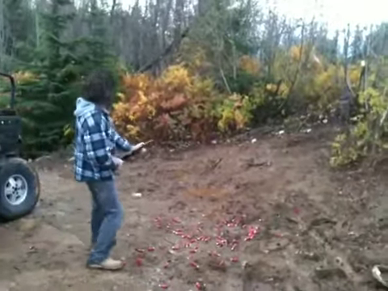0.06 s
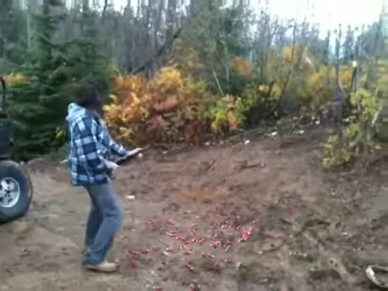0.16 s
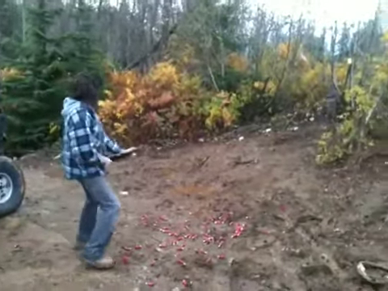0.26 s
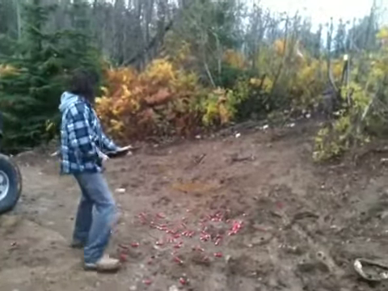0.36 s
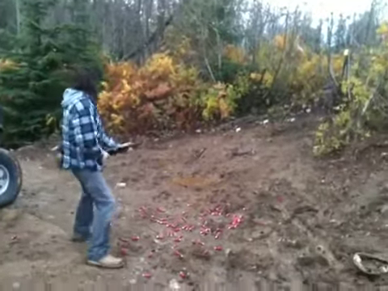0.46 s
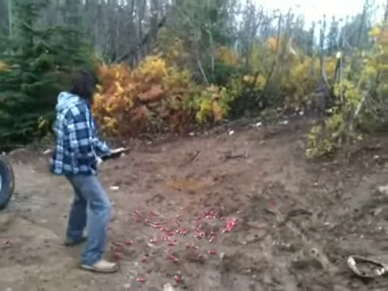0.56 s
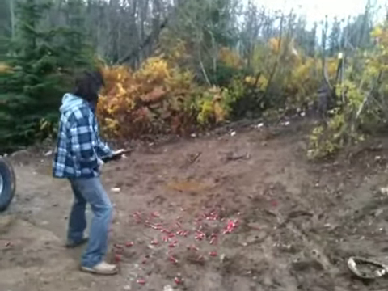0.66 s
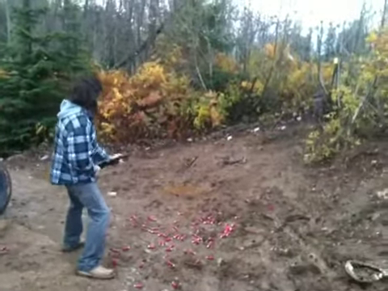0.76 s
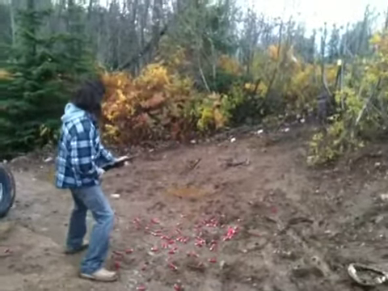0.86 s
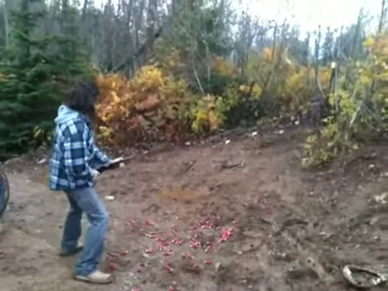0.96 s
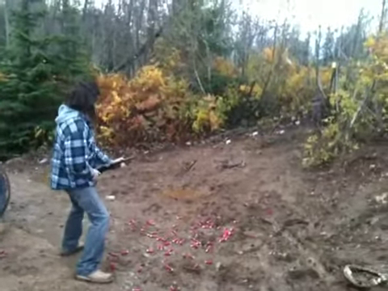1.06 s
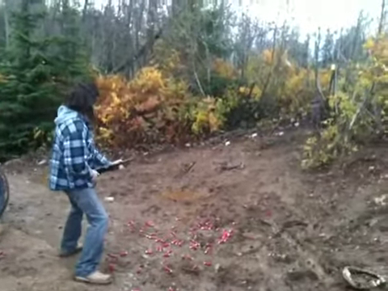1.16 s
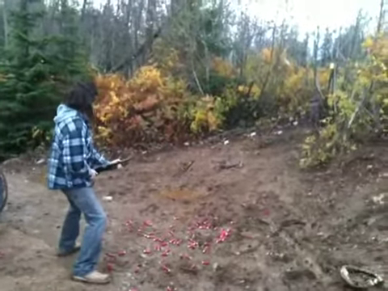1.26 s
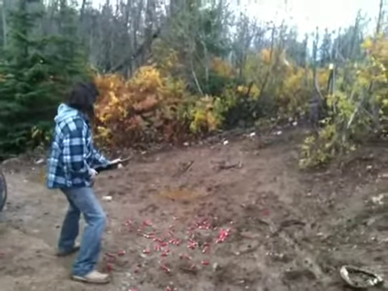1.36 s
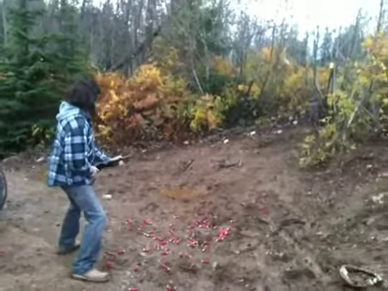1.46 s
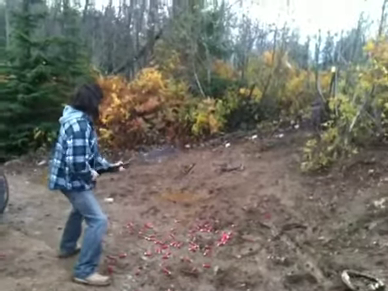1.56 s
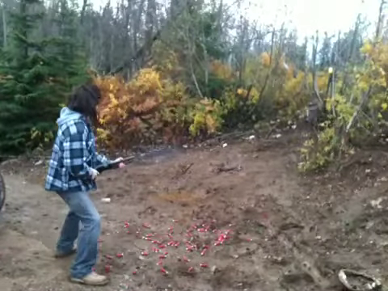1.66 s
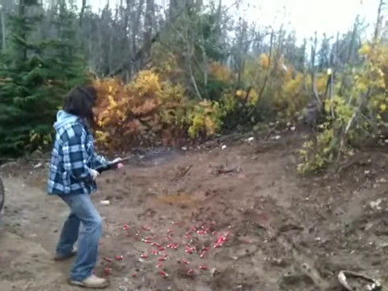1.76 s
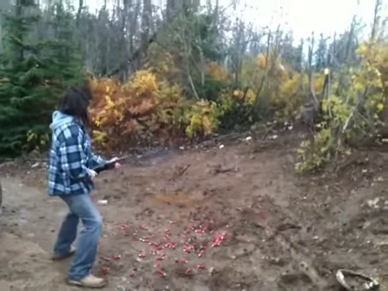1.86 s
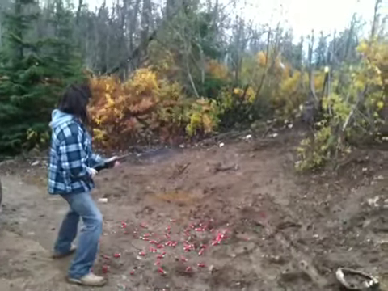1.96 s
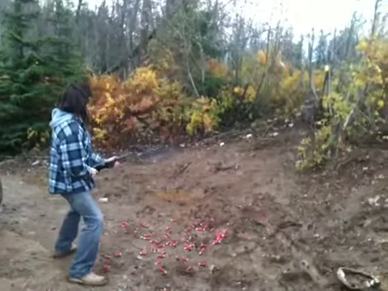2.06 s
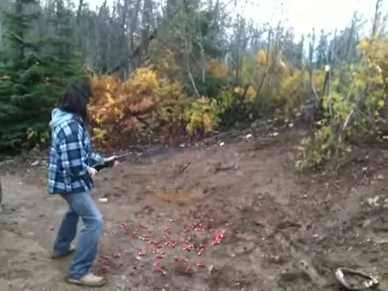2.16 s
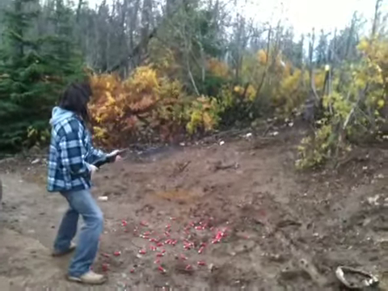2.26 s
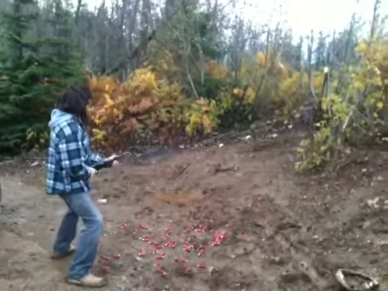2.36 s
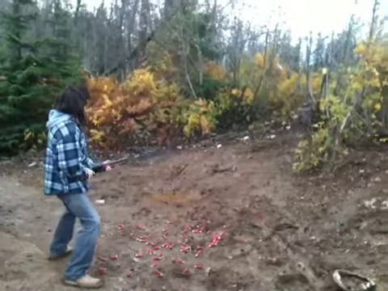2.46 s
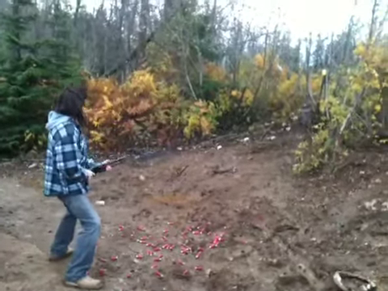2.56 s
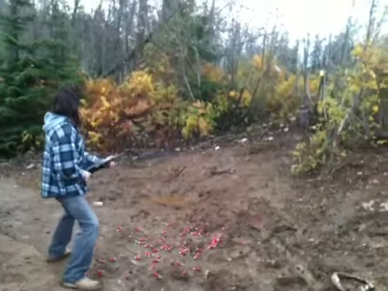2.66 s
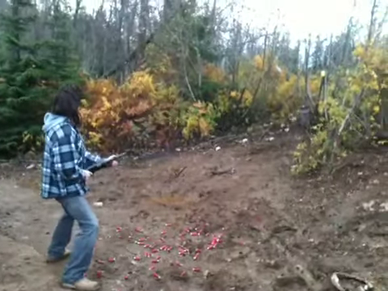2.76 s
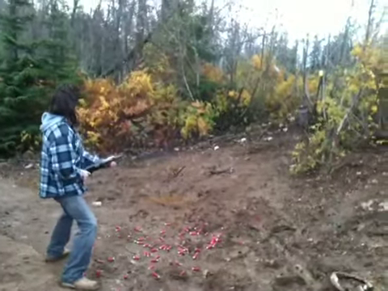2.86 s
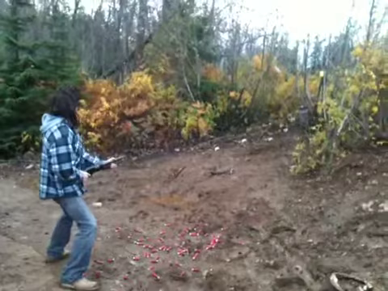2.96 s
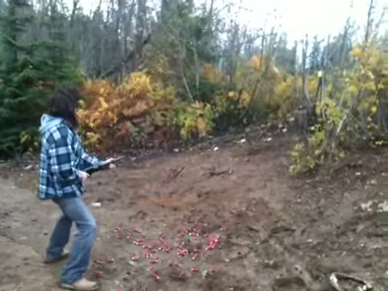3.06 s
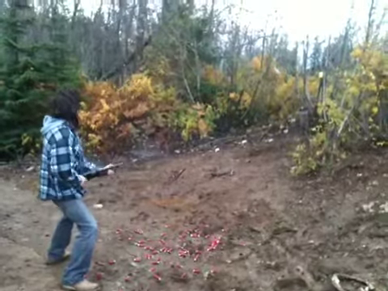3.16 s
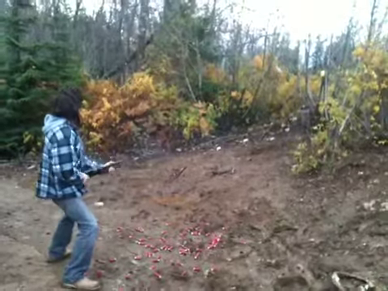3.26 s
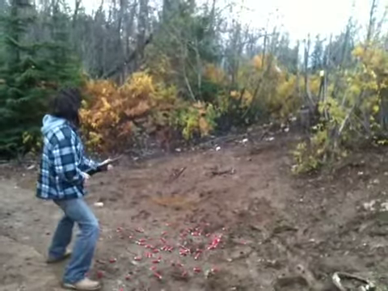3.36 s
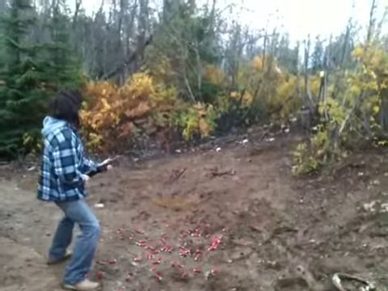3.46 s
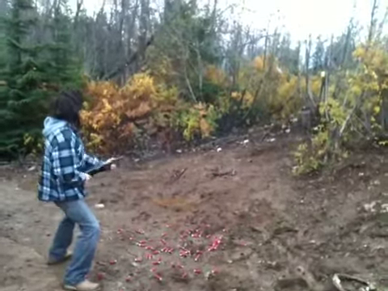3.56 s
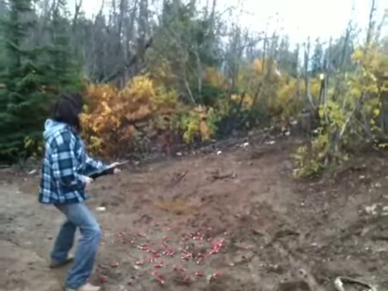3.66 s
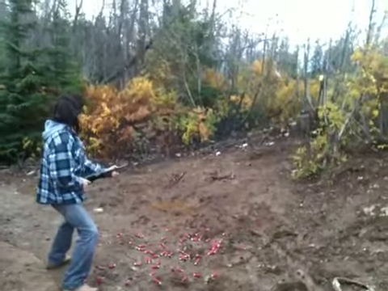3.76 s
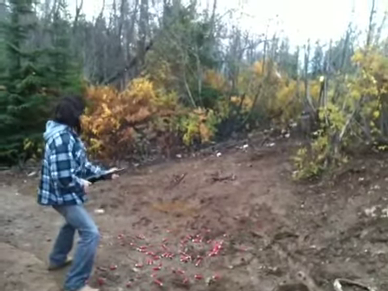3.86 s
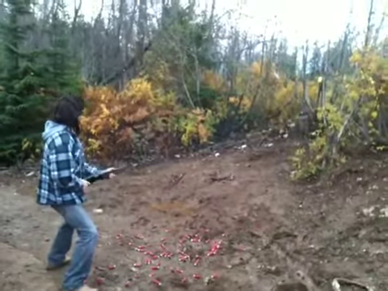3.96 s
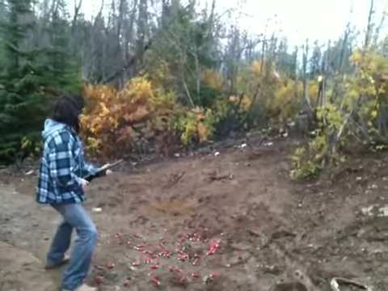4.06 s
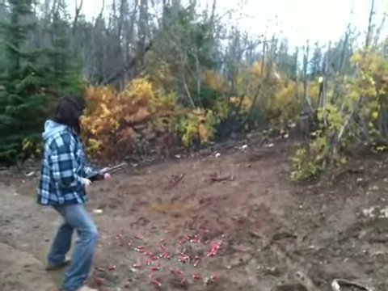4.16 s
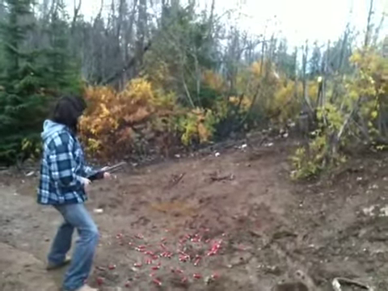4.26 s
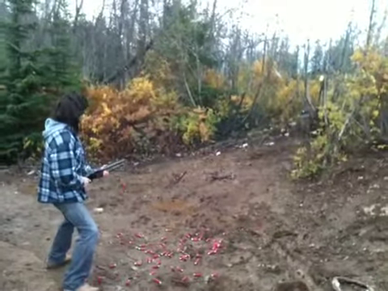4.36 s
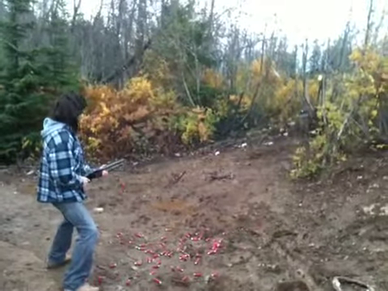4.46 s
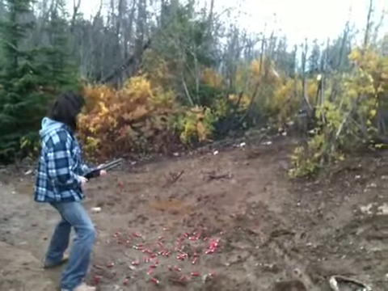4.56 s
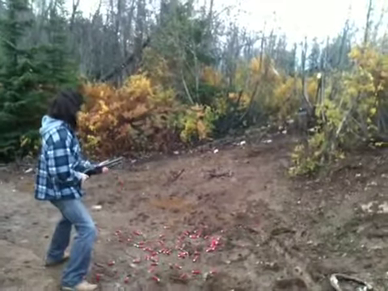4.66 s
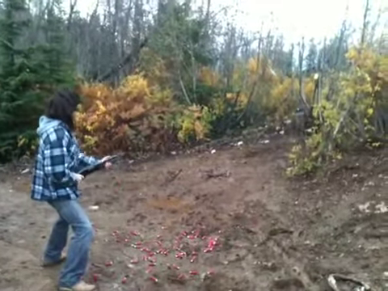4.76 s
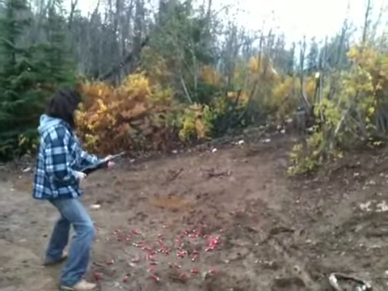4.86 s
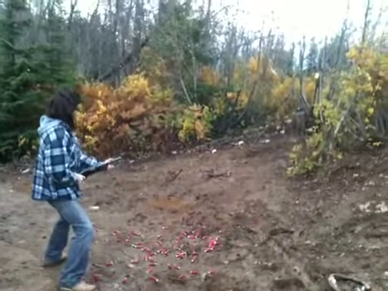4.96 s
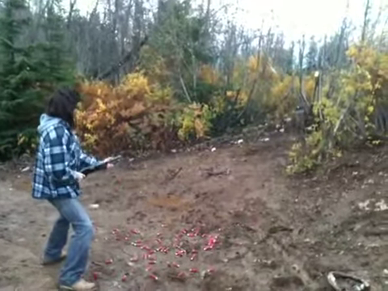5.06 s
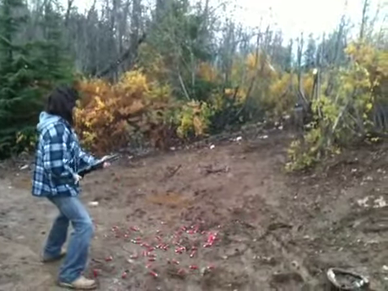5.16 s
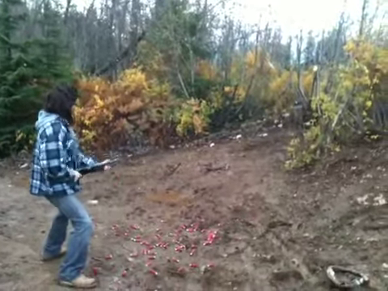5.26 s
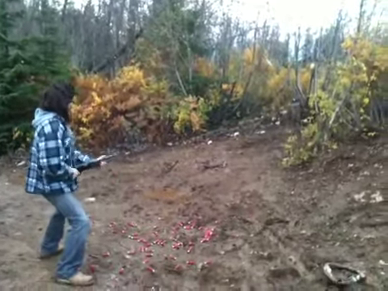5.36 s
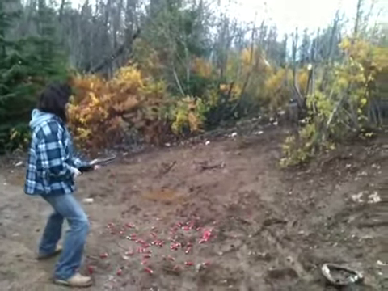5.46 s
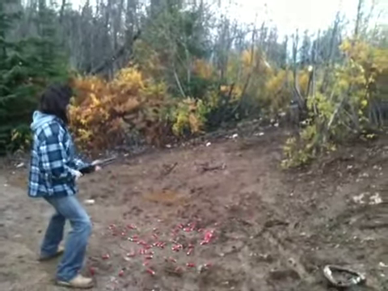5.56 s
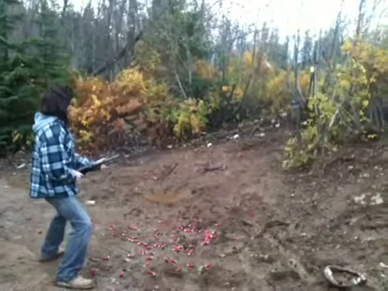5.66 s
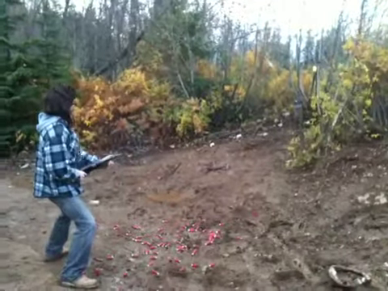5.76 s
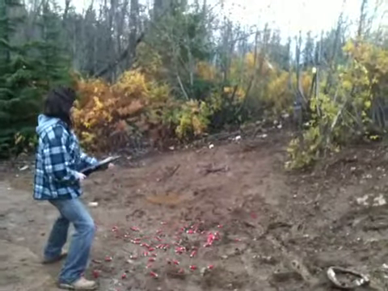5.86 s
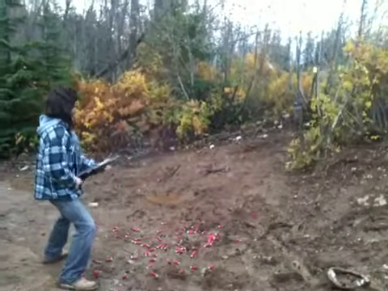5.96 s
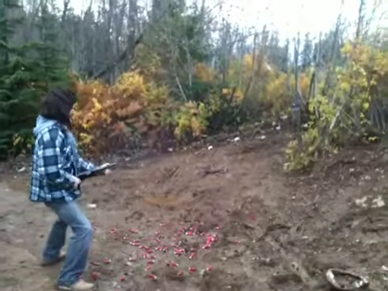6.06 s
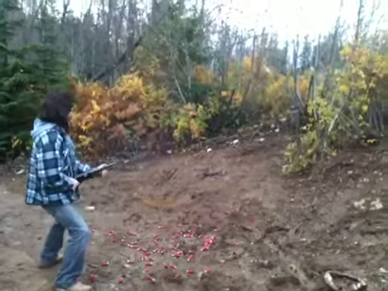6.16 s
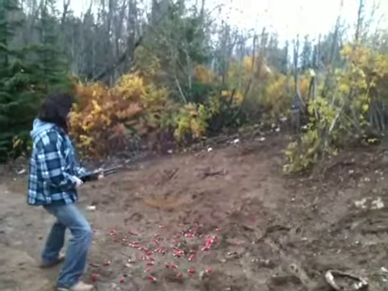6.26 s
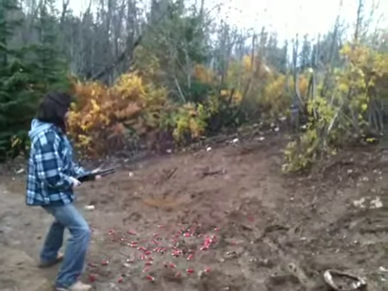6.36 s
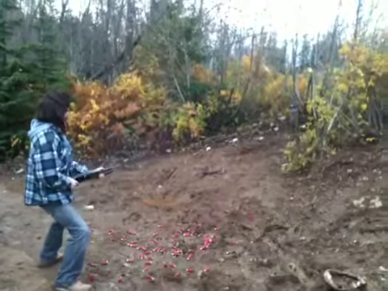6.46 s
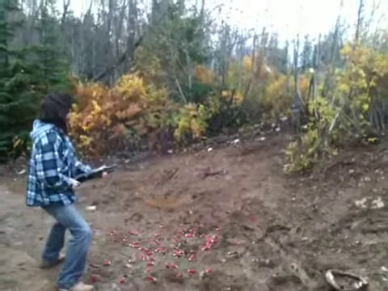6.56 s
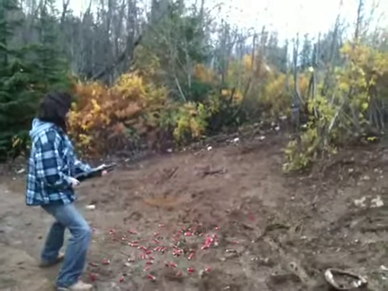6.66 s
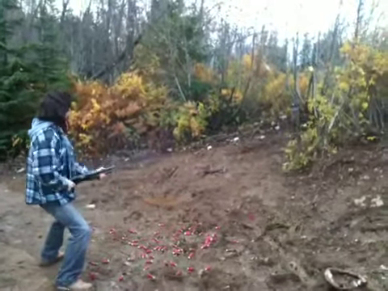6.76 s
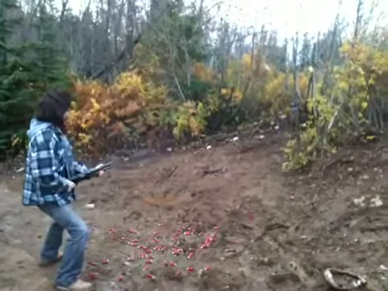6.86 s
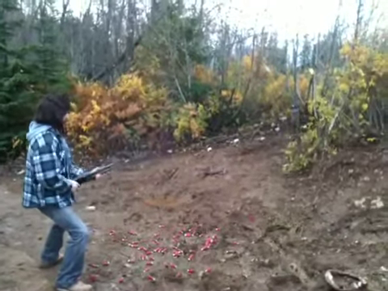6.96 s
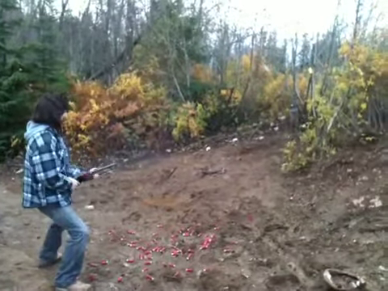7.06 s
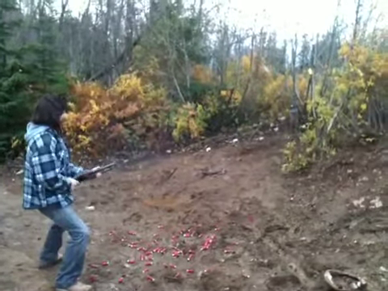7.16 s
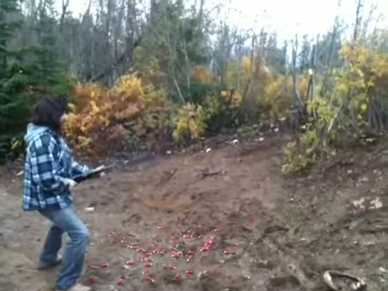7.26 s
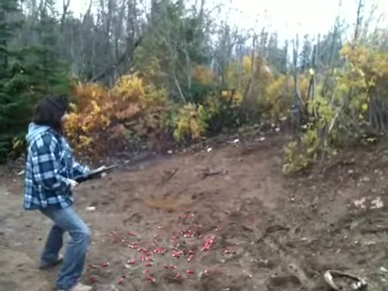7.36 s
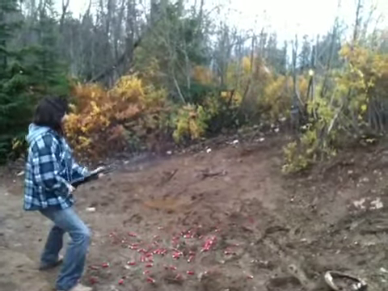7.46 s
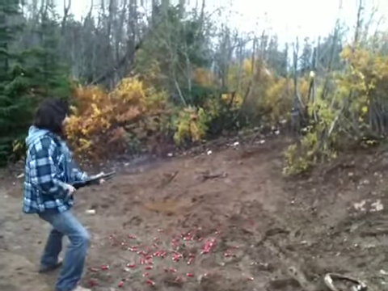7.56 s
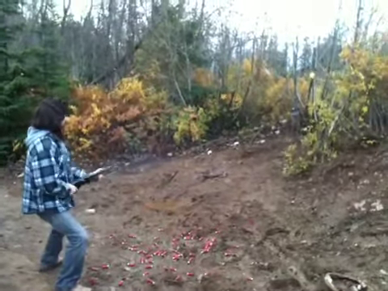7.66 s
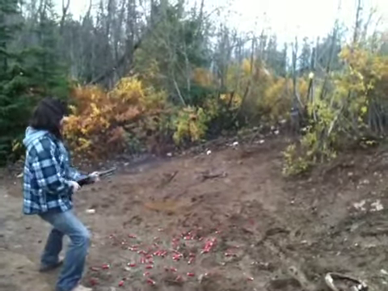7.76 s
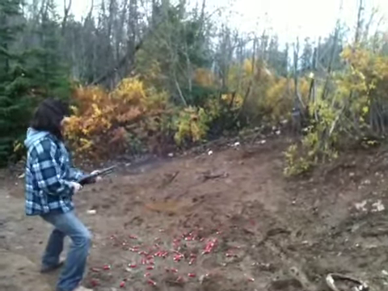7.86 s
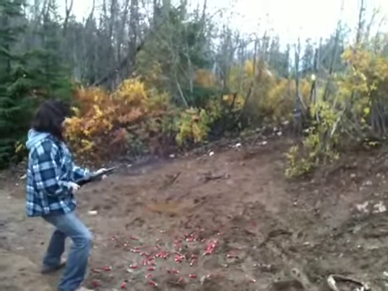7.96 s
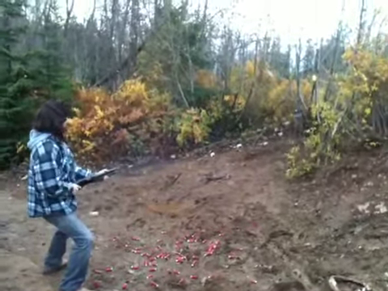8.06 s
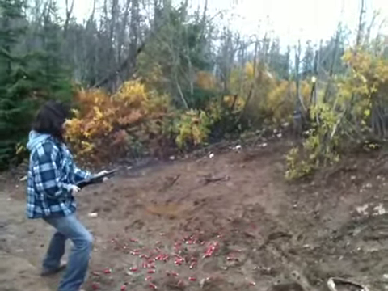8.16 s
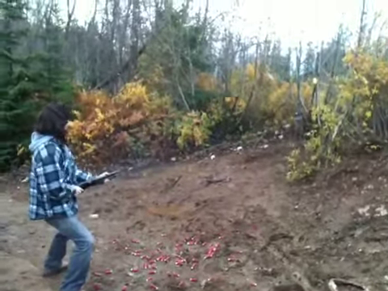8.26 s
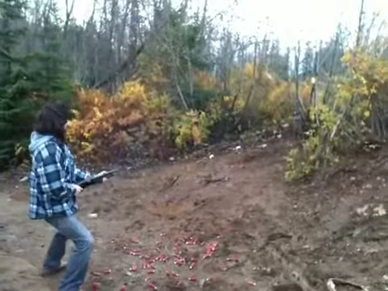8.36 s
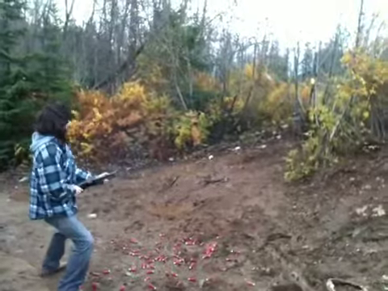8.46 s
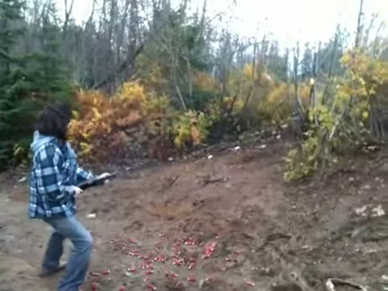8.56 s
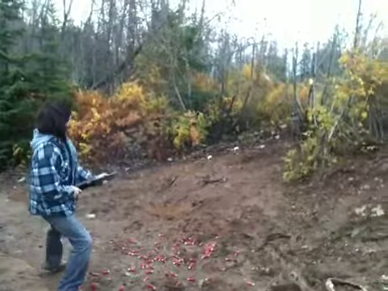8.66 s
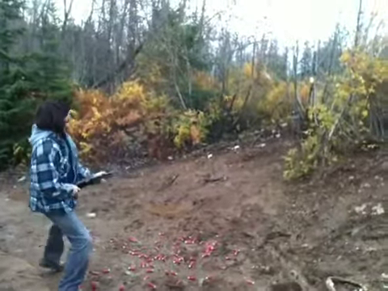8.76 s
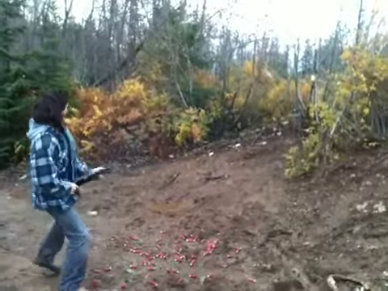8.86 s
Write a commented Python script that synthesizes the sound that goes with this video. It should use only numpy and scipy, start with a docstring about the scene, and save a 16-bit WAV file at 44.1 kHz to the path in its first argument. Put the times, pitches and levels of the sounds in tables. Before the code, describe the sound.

Quiet outdoor air with light cloth rustles and a soft boot scuff, then a pump shotgun fires six times. The first shots are well spaced, with clicks and racking between; the last four come quickly, under a second apart. Each crack is harsh and flattened, followed by dense slapback from a dirt bank and trees, darkening as it fades. A small handheld microphone stands a few metres away.

```python
"""First heard are brushing cloth and boots on soft dirt, over still air and a faint whine; then six shotgun blasts.
Each blast is scattered noise, muzzle-pulse echoes and a low boom; its colour darkens with delay, as from afar.
Between shots the action is racked: rubbing and striking steel is noise shaped by resonances.
Handling sounds excite a short reverberation of ground and trees; the input stage flattens the loudest peaks."""
import sys
import numpy as np
from scipy import signal
from scipy.fft import rfft, irfft
from scipy.io import wavfile
from scipy.ndimage import uniform_filter1d

SR = 44100
rng = np.random.default_rng(int(sys.argv[2]) if len(sys.argv) > 2 else 0)


def unload_audio(sound):
    """Save the sound as a 16-bit wav file, at the path given as the first command line argument."""
    columns = np.transpose(np.atleast_2d(sound))
    # keep every value between -1 and 1, then stretch to whole-number steps
    steps = np.round(np.clip(columns, -1, 1) * 32767)
    wavfile.write(sys.argv[1], SR, steps.astype(np.int16))


N = 393372

# one row a shot: (time [s], strength [dB], treble tilt [dB per octave])
SHOTS = [(1.5551, -2.5, 1.15), (3.164, -1.5, .5), (5.2079, -2, 0), (5.9952, -1, 0), (6.7516, -2, 0),
         (7.5216, -1.5, 0)]
# strongest single echoes, from trunks and the forest edge: (delay [s], pulse peak before colouring [dB])
STRONG_ECHOES = [(.1255, -5), (.148, 4.5), (.155, 6), (.169, 4.5), (.203, -8), (.208, 2.5), (.248, -6),
                 (.304, -20), (.362, -6), (.411, -8), (.576, -16.5), (.619, -13.5)]


def shots(alike=0.79):
    """Coherence of a fixed scatterer: the land stays put, so the shots share most of their reflections."""
    t = np.arange(round(1.7 * SR)) / SR
    land = reflections(len(t))
    echoes = STRONG_ECHOES + trunk_echoes()
    out = np.zeros(N)
    for s, db, tilt_db in SHOTS:
        # the shares add in power
        paths = np.sqrt(alike) * land + np.sqrt(1 - alike) * reflections(len(t))
        add(out, s, amp(db) * blast(t, paths, echoes, tilt_db))
    return out


# colour of a blast: (frequency [Hz], level from nearby [dB], level from far away [dB])
BLAST_COLOUR = [(40, -40, -43.5), (91, -27, -34), (170, -2, -7.5), (392, -1.5, -7), (624, 1.5, 4.5),
                (743, 3.5, 1.5), (1310, -1.5, -11), (1700, 1, -5.5), (2035, 4.5, -8), (2700, -6.5, -23),
                (3430, -1.5, -16), (6260, -4.5, -28), (8900, -9, -42), (15700, -15, -64.5)]
DULLING_S, DULLING_POWER = .3, 1.6  # with delay, the colour turns from nearby to far away
TILT_FROM_HZ = 2500  # a shot's tilt acts above this


def blast(t, paths, echoes, tilt_db, echo_s=0.00024, smear_db=-10, smear_s=0.0027, smear_growth=.007,
          boom_hz=308, boom_db=-2, boom_at=.027, boom_s=0.0078):
    """Propagation loss: the longer the path by which the land returns a shot, the more treble is lost."""
    pressure = paths * amp(scatter_db(t))
    brief = t[:SR // 50]
    for s, db in echoes:
        # a rough reflector returns the muzzle pulse with a smear behind it, longer from farther away
        smear_decay = np.exp(-brief / (smear_s + smear_growth * s))
        smear = amp(smear_db) * smear_decay * rng.standard_normal(len(brief))
        add(pressure, s, amp(db) * (muzzle_pulse(brief, echo_s) + smear))

    hz, when, spectrum = signal.stft(pressure, SR, nperseg=512, noverlap=384)
    far = 1 - np.exp(-(when / DULLING_S) ** DULLING_POWER)
    near_db = np.outer(read(BLAST_COLOUR, hz), 1 - far)
    far_db = np.outer(read(BLAST_COLOUR, hz, axis=2), far)
    tilt = amp(tilt_db * np.log2(np.maximum(hz / TILT_FROM_HZ, 1)))
    spectrum = spectrum * amp(near_db + far_db) * tilt[:, None]
    wave = signal.istft(spectrum, SR, nperseg=512, noverlap=384)[1][:len(t)]

    # a hollow low boom swells and dies inside the first few hundredths of a second
    swell = np.exp(-((t - boom_at) / boom_s) ** 2)
    boom = amp(boom_db) * swell * np.sin(2 * np.pi * boom_hz * t)
    return (wave + boom) * np.minimum(t / 0.0024, 1)


def muzzle_pulse(t, length):
    """Blast-wave form: a sudden overpressure followed by a longer, shallower suction."""
    u = np.maximum(t, 0) / length
    return (t >= 0) * (1 - u) * np.exp(-u)


def reflections(size, lumpy_db=3.5, foliage_db=1.15, split_hz=2300):
    """Size-dependent scattering: trunks and banks return lows in clumps, twigs and leaves treble evenly."""
    white = rng.standard_normal(size)
    clumps = evened(uniform_filter1d(uniform_filter1d(rng.standard_normal(size), size=240), size=80))
    low = signal.sosfiltfilt(signal.butter(2, split_hz, fs=SR, output="sos"), white)
    lumpy = evened(amp(lumpy_db * np.minimum(clumps, 1)))
    even = evened(amp(foliage_db * clumps))
    return low * lumpy + (white - low) * even


# what throws each blast back, in turn the ground at the muzzle, the dirt bank, the trees round the
# clearing and the distant forest:
# (arrival [s], hold [s], level before colouring [dB], rise [dB per s], fall [dB per s])
RETURNS = [(0, .003, 4, 300, 330), (0.044, .017, 5, 330, 165), (.2, .01, -8, 90, 53),
           (.58, 0.1, -24, 128, 51)]


def scatter_db(t):
    """Incoherent addition: each part of the land swells, holds and dies away, and their powers add."""
    power = 1e-20
    for s, hold, db, rise, fall in RETURNS:
        before, after = np.maximum(s - t, 0), np.maximum(t - s - hold, 0)
        power = power + amp(db - rise * before - fall * after) ** 2
    return 10 * np.log10(power)


TRUNKS_PER_S, TRUNK_DB, NEAREST_TRUNK_S = 22, -2, .11  # TRUNK_DB: largest level against the scatter


def trunk_echoes(count=20):
    """Discrete scattering: lesser echoes at random delays, fading with the scatter; rows like STRONG_ECHOES."""
    place, size = rng.random((count, 2)).T
    delay = NEAREST_TRUNK_S + (np.arange(count) + place) / TRUNKS_PER_S
    return list(zip(delay, scatter_db(delay) + TRUNK_DB + 10 * np.log10(size + 1e-6)))


# a push of air at the microphone: (time [s], peak before the input stage [dB], length [s])
GUST = (7.5398, 12, 0.0022)


def gust():
    """Bulk air flow: the last shot shoves the microphone with a pulse of air."""
    s, db, length = GUST
    return amp(db) * muzzle_pulse(np.arange(N) / SR - s, length)


# broad colour of the gun's steel: (frequency [Hz], level [dB])
STEEL = [(40, -27), (200, -14.5), (600, -9.5), (1000, -4), (1400, -4.5), (2200, 0), (2900, -5), (4800, -2),
         (7300, -1.5), (8500, -7.5), (13000, -13), (16000, -19)]
# resonances that all the steel parts share: (frequency [Hz], width [Hz], lift above the broad colour [dB])
STEEL_RINGS = [(1030, 77, 5), (2173, 210, -1), (3650, 220, 3.5), (5430, 300, 4), (6550, 390, 2.5),
               (10460, 160, 3.5), (13440, 160, 8.5)]
# lighter clicks of trigger, latch and shell:
# (time [s], level [dB], decay time [s], treble tilt [dB per octave])
CLICKS = [(2.287, -22.5, 0.0038, 1.5), (2.416, -30.5, 0.01, 1), (2.506, -27.5, 0.01, 0),
          (2.944, -38.5, 0.0026, 2), (3.620, -27, 0.0051, 0.5), (4.007, -29, 0.0026, -0.5),
          (4.158, -34, 0.0068, 0.5), (4.223, -23, 0.0042, 0.5), (4.691, -34, 0.0031, .5),
          (5.028, -49.5, .0036, -1), (5.045, -43.5, 0.0031, 2.5), (5.154, -49.5, 0.0038, 0),
          (8.265, -23, 0.0054, -1.5), (8.617, -48, .0071, -3.5), (8.736, -47.5, 0.0033, -1)]
CLICK_HZ, CLICK_RING_DB = 6850, 3.5  # the small parts' own resonance


def action(chatter_db=4):
    """Friction and impact: steel parts rub with an uneven chatter, then hit their stops and rattle."""
    chatter = amp(chatter_db * evened(uniform_filter1d(rng.standard_normal(N), size=300)))
    rub = evened(noise(STEEL, N, 0, STEEL_RINGS) * chatter)
    contacts = [contact for row in PUMPS for contact in pump_contacts(*row)]
    clacks = strikes(contacts, STEEL, STEEL_RINGS, rise_s=.0022, rattle_db=2.0,
                     main_width_hz=900, main_db=5.5)
    clicks = strikes([(*row, CLICK_HZ) for row in CLICKS], STEEL, STEEL_RINGS, rise_s=.0026,
                     rattle_db=1.5, main_width_hz=500, main_db=CLICK_RING_DB)
    return rub * stroke_effort() + clacks + clicks


# one row a pump of the action: (back stop time [s], level [dB], treble tilt [dB per octave],
# front stop time [s], level [dB], treble tilt [dB per octave])
PUMPS = [(2.462, -6.5, 3, 2.726, -15.5, 1), (4.187, -13.5, 1.5, 4.808, -12, 1.5),
         (5.511, -11, -1, 5.773, -15.5, 0.5), (6.291, -10, 0.5, 6.552, -16, .5),
         (7.046, -8.5, 1.5, 7.292, -14, 0), (7.794, -9.5, 0, 8.038, -14, -1.5)]
BACK_DECAY_S, BACK_HZ = 0.0047, 7420  # the action hits its back stop
FRONT_DECAY_S, FRONT_HZ = .0043, 4970  # it locks at the front
BOLT_LEAD_S, BOLT_DB, BOLT_DECAY_S, BOLT_HZ = .0105, -8, .012, 3786  # lands before the lock; dB against it
FEED_DB, FEED_SPREAD_DB, FEED_DECAY_S = -41, 1.6, .004  # the shell jostles on its way in
PULL_S, PULL_DB, PULL_RISE_DB = 0.049, -37, 17  # the backward stroke rasps louder as it gathers speed
SLIDE_S, SLIDE_DB = .11, -49.5  # the forward stroke that leads up to the lock


def pump_contacts(back_s, back_db, back_tilt_db, front_s, front_db, front_tilt_db, count=3):
    """Successive impacts of one pump: ticks of the feeding shell, back stop, bolt, lock."""
    contacts = [(back_s, back_db, BACK_DECAY_S, back_tilt_db, BACK_HZ),
                (front_s - BOLT_LEAD_S, front_db + BOLT_DB, BOLT_DECAY_S, front_tilt_db, BOLT_HZ),
                (front_s, front_db, FRONT_DECAY_S, front_tilt_db, FRONT_HZ)]
    for k in range(count):
        tick_s = front_s - SLIDE_S * (k + rng.random()) / count
        tick_db = FEED_DB + FEED_SPREAD_DB * rng.standard_normal()
        contacts.append((tick_s, tick_db, FEED_DECAY_S, 0, CLICK_HZ))
    return contacts


def stroke_effort():
    """Sliding friction grows with speed: a quickening pull to the back stop, an even push to the lock."""
    t, effort = np.arange(N) / SR, np.zeros(N)
    for back_s, _, _, front_s, _, _ in PUMPS:
        to_go = (back_s - t) / PULL_S
        pulling = (to_go > 0) & (to_go < 1)
        effort[pulling] += amp(PULL_DB - PULL_RISE_DB * to_go[pulling])
        effort[(t > front_s - SLIDE_S) & (t < front_s)] += amp(SLIDE_DB)
    return uniform_filter1d(effort, size=300)


# hollow knocks as a shell is handled: (time [s], level [dB], decay time [s], treble tilt [dB per octave])
KNOCKS = [(4.223, -28.5, 0.0038, 3), (4.691, -40, .018, 0), (4.778, -43, .008, 0)]
# colour of a knock: (frequency [Hz], level [dB])
HOLLOW = [(100, -31.5), (900, -12), (1250, 6), (1500, 2), (2000, -32), (3200, -15), (9000, -38),
          (16000, -50)]
# the cavity's resonances: (frequency [Hz], width [Hz], lift above the broad colour [dB])
HOLLOW_RINGS = [(1290, 70, 8), (3200, 160, 9)]


def knocks():
    """Cavity resonance: dull contacts sound one small hollow."""
    return strikes(KNOCKS, HOLLOW, HOLLOW_RINGS, rise_s=.002)


def strikes(rows, colour, rings, rise_s, rattle_db=0.5, detune=0.0076, main_width_hz=850, main_db=6.0):
    """Modal excitation: short, rattling contacts; resonances shift as the parts sit differently each time."""
    out, t = np.zeros(N), np.arange(SR // 4) / SR
    for s, db, decay, tilt_db, *main in rows:
        shape = np.minimum(t / rise_s, 1) * np.exp(-np.maximum(t - rise_s, 0) / decay)
        wobble = evened(uniform_filter1d(rng.standard_normal(len(t)), size=50))
        rattle = evened(amp(rattle_db * wobble))
        modes = [(hz * (1 + detune * rng.standard_normal()), width, lift) for hz, width, lift in rings]
        modes += [(hz, main_width_hz, main_db) for hz in main]  # the contact's own resonance, if it has one
        add(out, s, amp(db) * shape * rattle * noise(colour, len(t), tilt_db, modes))
    return out


def clearing(x, wet_db=-11.0, near_t60=.16, far_db=-17, far_t60=0.42, dull_hz=7000, trees_hz=2500):
    """Reverberation: small sounds come back briefly from the ground, and faint and dull from the trees."""
    t = np.arange(SR // 2) / SR
    ground, trees = rng.standard_normal((2, len(t))) * (t > .005)
    ground = signal.lfilter(*signal.butter(1, dull_hz, fs=SR), ground) * amp(-60 * t / near_t60)
    trees = signal.lfilter(*signal.butter(1, trees_hz, fs=SR), trees) * amp(far_db - 60 * t / far_t60)
    tail = ground + trees
    return x + amp(wet_db) * signal.fftconvolve(x, tail / np.linalg.norm(tail))[:N]


# boots shifting on soft dirt: (time [s], level [dB], decay time [s], treble tilt [dB per octave])
SCUFFS = [(.466, -49.5, .014, 2), (.5, -41, 0.008, -.5), (.927, -62, .012, -6), (.984, -45.5, 0.011, -12),
          (1.525, -59.5, .017, -4), (2.958, -58, .015, -5), (4.235, -49.5, 0.04, -20),
          (4.567, -54, .015, -14), (4.88, -44.5, 0.022, -13), (4.905, -43, 0.015, -15),
          (5.1, -54.5, .03, -15)]
# colour of a scuff: (frequency [Hz], level [dB])
DIRT = [(40, -30.5), (110, -7), (190, 2.5), (350, -6.5), (700, -17), (2000, -30.5), (6000, -42.5),
        (16000, -50.5)]


def scuffs():
    """Granular friction: boots on soft dirt give short, mostly low bursts of noise."""
    return strikes(SCUFFS, DIRT, (), rise_s=0.0056)


# clothing and grit brushing: (time [s], level [dB], decay time [s], treble tilt [dB per octave])
RUSTLES = [(.083, -52.5, 0.066, 0), (.106, -44, .0063, -0.5), (.179, -46.5, 0.0066, 2.5),
           (.2, -53, 0.037, 1), (.315, -59, .047, 0.5), (.498, -50, .0064, 3)]
# colour of a rustle: (frequency [Hz], level [dB])
CLOTH = [(50, -40), (140, -3), (300, 5), (700, -1.5), (1700, -4), (3000, -20), (7000, -14.5), (16000, -42)]


def rustles():
    """Surface friction: brushing clothing and grit give short bursts of coloured noise."""
    return strikes(RUSTLES, CLOTH, (), rise_s=0.0025)


# spectrum of still air: (frequency [Hz], relative density [dB per Hz])
AIR = [(18, -47), (30, -18.5), (202, 4), (389, -2), (2760, -12.5), (7860, -11.5), (8950, -13.5),
       (9680, -10.5), (15500, -19)]
AIR_DB = -68  # rms
# faint camera electronics: (frequency [Hz], rms level [dB])
WHINE = [(6998, -84.5), (8000, -85.5), (9502, -84), (10998, -88.5), (13001, -88)]


def quiet():
    """Stationary background: still air as steady noise, and a thin electronic whine of steady sines."""
    t = np.arange(N) / SR
    whine = sum(amp(db) * np.sqrt(2) * np.sin(2 * np.pi * hz * t) for hz, db in WHINE)
    return amp(AIR_DB) * noise(AIR, N) + whine


def noise(colour, size, tilt_db=0, rings=()):
    """Spectral shaping: noise of rms 1 with a broad colour, a tilt per octave above 200 Hz and resonances."""
    hz = np.fft.rfftfreq(size, 1 / SR)
    db = read(colour, hz) + tilt_db * np.log2(np.maximum(hz, 200) / 200)
    for centre, width, lift in rings:
        db = db + lift / (1 + (2 * (hz - centre) / width) ** 2)
    return evened(irfft(rfft(rng.standard_normal(size)) * amp(db), size))


def amp(db):
    """Decibel law: level to amplitude ratio."""
    return 10 ** (np.asarray(db) / 20)


def evened(x):
    """Power normalisation: scales to rms 1."""
    return x / np.sqrt(np.mean(x ** 2) + 1e-20)


def read(points, hz, axis=1):
    """Logarithmic pitch scale: one column of a spectrum table, joined on a log-frequency axis."""
    table = np.transpose(points)
    return np.interp(np.log(hz + 1), np.log(table[0]), table[axis])


def add(mix, s, sound):
    """Superposition: mixes a sound in at time s, in place."""
    part = mix[max(round(s * SR), 0):][:len(sound)]
    part += sound[:len(part)]


def scene(low_cut_hz=128):
    """Superposition of all sources; the small microphone takes in little bass from the blasts."""
    bass_cut = signal.butter(4, low_cut_hz, "high", fs=SR, output="sos")
    blasts = signal.sosfilt(bass_cut, shots())
    handling = clearing(action() + knocks())
    return (blasts + gust() + handling + scuffs() + rustles() + quiet())[None]


EDGE_HZ = 15900  # upper band limit


def record(dry, ceiling_db=-3.5, knee=8.0):
    """Saturation, then band limiting: the input stage flattens the blasts; lows and top treble are cut."""
    ceiling = amp(ceiling_db)
    clipped = dry / (1 + abs(dry / ceiling) ** knee) ** (1 / knee)
    clipped = signal.lfilter(*signal.butter(1, 22, "high", fs=SR), clipped)
    low_pass = signal.firwin(255, EDGE_HZ, window=("kaiser", 8), fs=SR)
    return signal.oaconvolve(clipped, low_pass[None], "same")


dry = scene()
out = record(dry)
unload_audio(out)
```